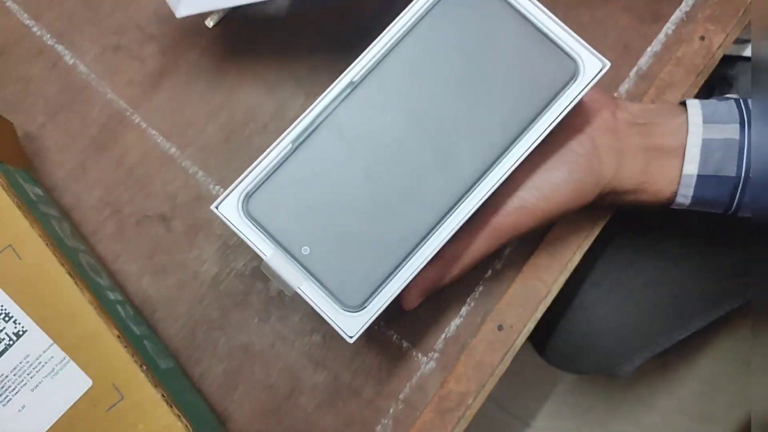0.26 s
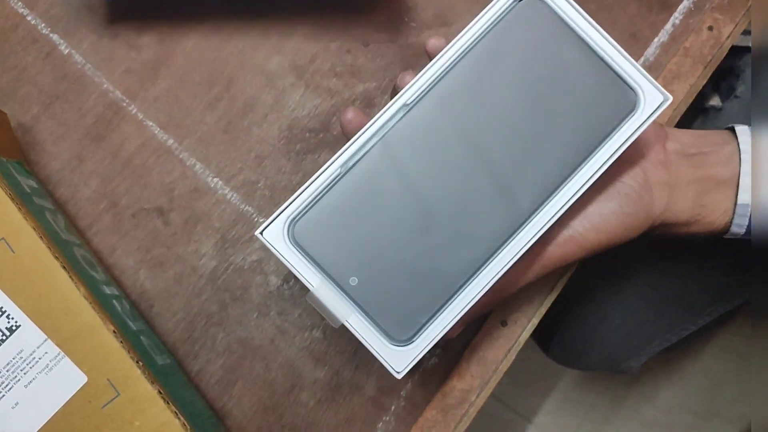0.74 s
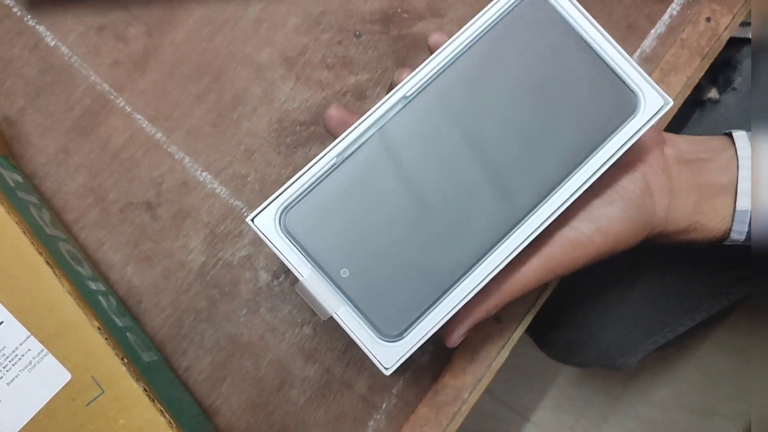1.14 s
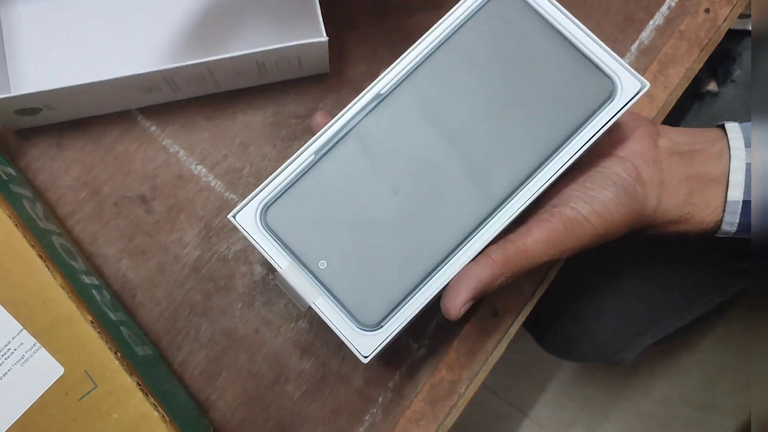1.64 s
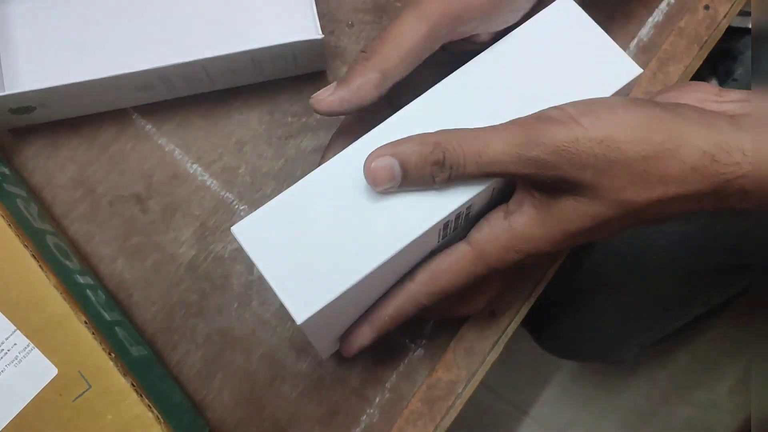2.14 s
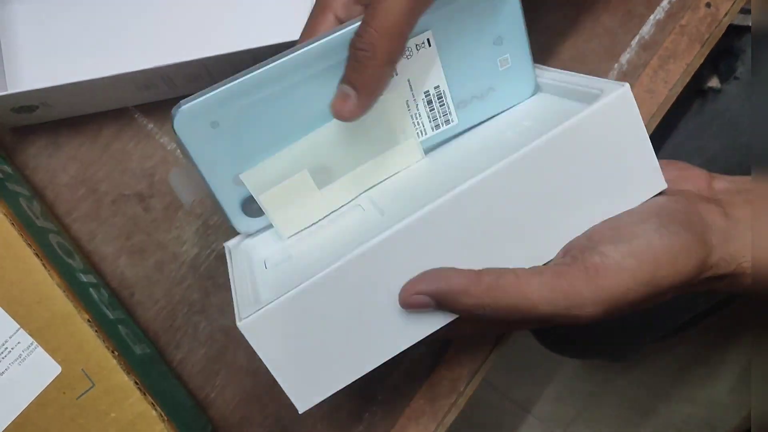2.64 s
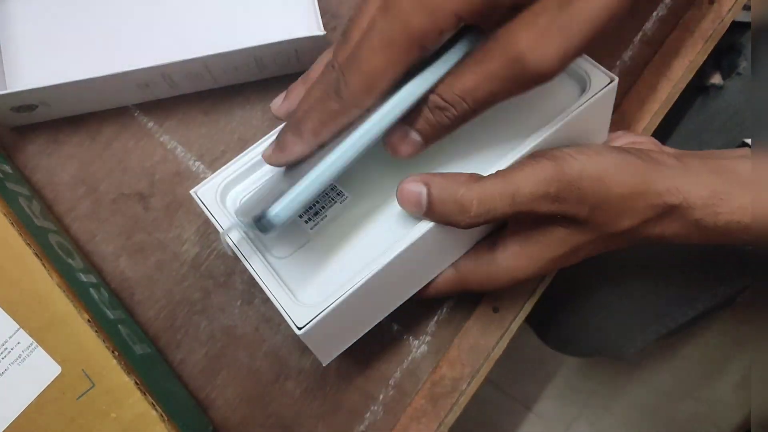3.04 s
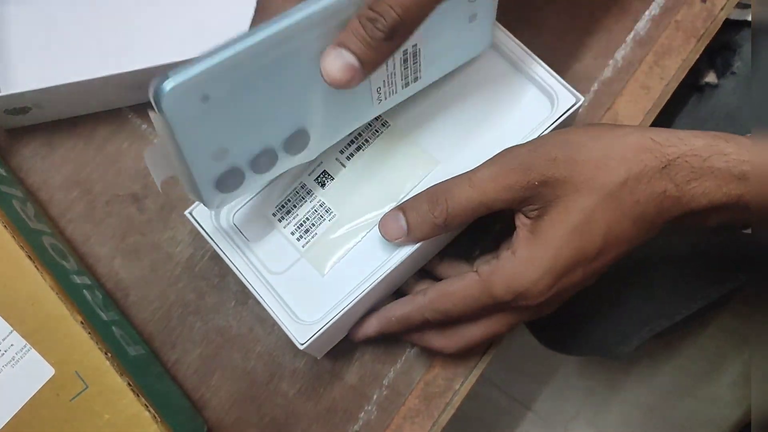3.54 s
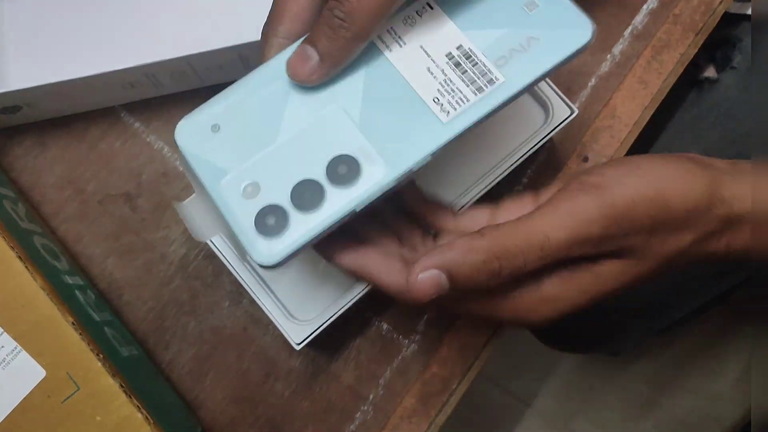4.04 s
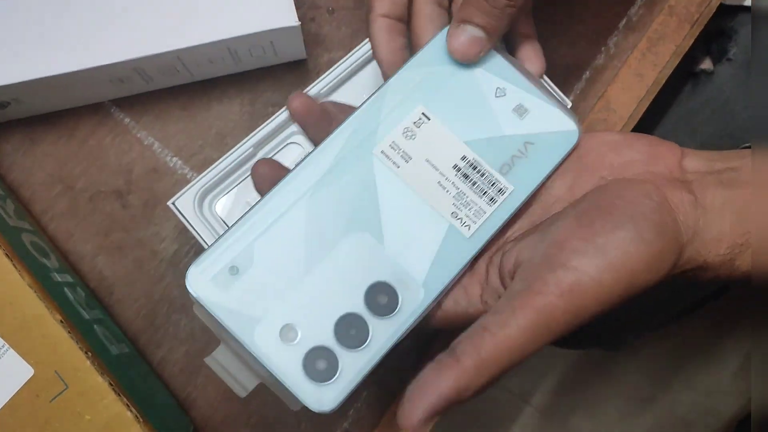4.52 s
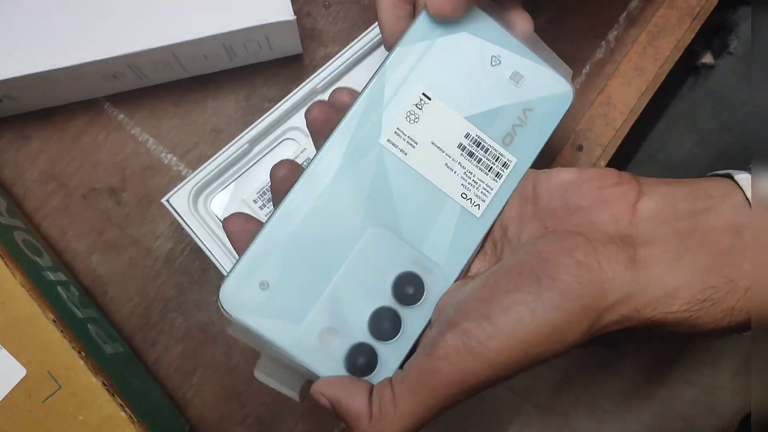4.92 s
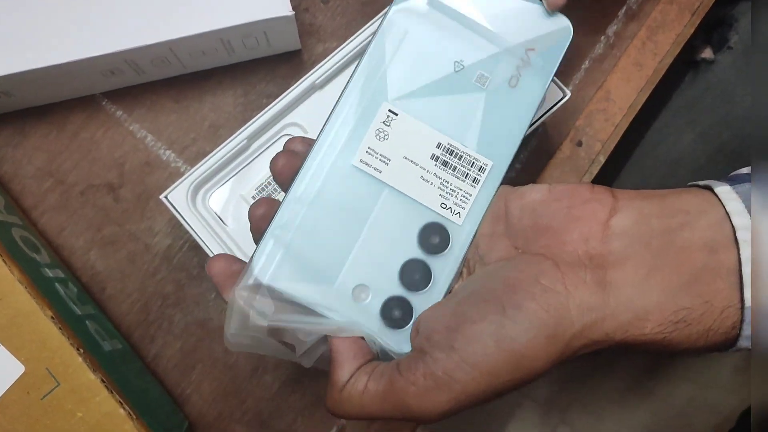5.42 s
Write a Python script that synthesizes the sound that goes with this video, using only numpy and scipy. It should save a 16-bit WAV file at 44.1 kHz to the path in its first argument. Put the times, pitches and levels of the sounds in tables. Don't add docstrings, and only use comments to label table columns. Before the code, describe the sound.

Hands unpack a phone from a small cardboard box on a wooden desk. A light tap and faint finger squeak come first, then the lid drags with a hollow stick-slip scrape and drops in two hard knocks. After a pause, the box is tipped and knocked down, and protective film crackles, snapping brightest near the end. Quiet room with low fan noise, close stereo phone microphone.

```python
import sys
import numpy as np
from scipy import signal
from scipy.fft import rfft, irfft, next_fast_len
from scipy.io import wavfile
from scipy.ndimage import uniform_filter1d

SR = 44100
rng = np.random.default_rng(int(sys.argv[2]) if len(sys.argv) > 2 else 0)


def gain_from_db(level_db):
    decades = np.asarray(level_db, float) / 20
    return 10 ** decades


def master_out(mix):
    frames = np.transpose(np.atleast_2d(mix))
    ceiling = np.clip(frames, -1, 1)
    pcm = np.round(ceiling * 32767).astype(np.int16)
    wavfile.write(sys.argv[1], SR, pcm)


N = 250223
T = np.arange(N) / SR
FAST = next_fast_len(N)

# frequency in Hz, level in dB, t60 in seconds.
LID_MODES = [(174, -45, 0.22), (236.6, 3, 0.14), (417, 1, 0.051), (494.6, 1.5, 0.084), (630, 6.5, 0.03),
             (700, 1, 0.074), (895.4, 2, 0.034), (1242, -3, 0.029), (1450, -9.5, 0.046), (1990, -2, 0.02),
             (1930, -12, 0.063), (2720, -41, .03)]
# frequency in Hz, level in dB, t60 in seconds.
DESK_MODES = [(66.1, -16, 0.66), (102.6, -9.5, 0.25), (159.6, -3, 0.22)]


def on_log(table, hz, column=1):
    rows = np.array(table)
    return np.interp(np.log(np.maximum(hz, 1)), np.log(rows[:, 0]), rows[:, column])


def band(x, lo_hz, hi_hz):
    sos = signal.butter(2, [lo_hz, min(hi_hz, .45 * SR)], "band", fs=SR, output="sos")
    y = signal.sosfilt(sos, x)
    return y / np.std(y)


def ring(modes, stretch=0.6, size=16384):
    t = np.arange(size) / SR
    out = np.zeros(size)
    for k, (hz, db, t60_s) in enumerate(modes):
        decay = np.exp(-np.log(1000) * t / (t60_s * stretch))
        out += (-1) ** k * gain_from_db(db) * decay * np.sin(2 * np.pi * hz * t)
    return out


def add(track, start_s, sound):
    i = int(start_s * SR)
    track[i:i + len(sound)] += sound[:N - i]


def walk(rate_hz):
    k = max(int(SR / 64 / rate_hz), 1)
    w = uniform_filter1d(uniform_filter1d(rng.standard_normal(N // 64 + 2), k), k)
    return np.interp(np.arange(N) / 64, np.arange(len(w)), w / np.std(w))


def grains(rate_hz, scatter_db):
    chance = rng.random((3, N))
    happens = chance[0] < rate_hz / SR
    size = gain_from_db(-scatter_db * np.log(chance[2] + 1e-9))
    return happens * np.sign(chance[1] - .5) * size


def swells(rows, extra_db=0):
    gain = np.zeros(N)
    for row, more_db in zip(rows, np.zeros(len(rows)) + extra_db):
        peak_s, db, rise_s, fade_s = row[:4]
        slope = np.where(T < peak_s, (T - peak_s) / rise_s, (peak_s - T) / fade_s)
        gain += gain_from_db(db + more_db) * np.exp(slope)
    return gain


def diffuse(x, y):
    # frequency in Hz, likeness of the ports from 0 to 1.
    alike = [(60, 0.8), (130, 0.93), (290, 0.92), (640, 0.63), (1410, 0), (3100, 0), (6820, 0.08),
             (15000, 0.0)]
    size = next_fast_len(len(x))
    c = np.clip(on_log(alike, np.fft.rfftfreq(size, 1 / SR)), 0, 1)
    mid = rfft(x, size) * np.sqrt((1 + c) / 2)
    side = rfft(y, size) * np.sqrt((1 - c) / 2)
    return irfft(np.array([mid + side, mid - side]), size)[:, :len(x)]


def air():
    # frequency in Hz, density in dB per Hz.
    fan = [(12, -30), (20, 12), (48, 6.5), (70, -5.5), (107, 0), (123, -5.5), (248, -7), (328, -6.5),
           (513, -5), (738, -11.5), (2080, -14), (2320, -12), (5680, -29), (13500, -33), (16000, -68)]
    fan_db, hum_hz, hum_db = -51.5, 100, -66
    out, swell = 0, walk(0.33)
    for hz in 22 * 2 ** np.arange(0, 9.6, .5):
        db = on_log(fan, hz) + 10 * np.log10(hz) + .3 * swell + 1.4 * walk(11)
        out = out + gain_from_db(db) * band(rng.standard_normal((2, N)), hz / 2 ** 0.27, hz * 2 ** 0.19)
    hum = gain_from_db(hum_db + 3 * walk(4)) * np.sin(2 * np.pi * hum_hz * T)
    return diffuse(*out) * gain_from_db(fan_db) / np.std(out) + hum


def room_tail(size=32768):
    # frequency in Hz, t60 in seconds, level in dB.
    room = [(60, 0.8, -7), (240, 0.47, -5), (700, 0.5, -0.5), (1990, 0.44, -4), (4920, 0.54, -9.5),
            (12200, 0.22, 6.5)]
    t, tails = np.arange(size) / SR, 0
    onset = 1 - np.exp(-(t / 0.004) ** 2)
    for hz in 63 * 2. ** np.arange(8):
        t60_s = on_log(room, hz)
        noise = band(rng.standard_normal((2, size)), hz / np.sqrt(2), hz * np.sqrt(2)) * np.sqrt(hz / t60_s)
        fade = np.exp(-np.log(1000) * t / t60_s) * onset
        tails = tails + gain_from_db(on_log(room, hz, column=2)) * noise * fade
    return diffuse(*tails) / np.sqrt(np.sum(tails[0] ** 2))


def scatter(x, lags):
    glance_share = 0.19
    for lag in lags:
        taps = np.r_[1, np.zeros(int(lag) - 1), glance_share]
        x = np.roll(signal.lfilter(taps[::-1], taps, x), -int(lag))
    return x


def rustle():
    # peak in seconds, level in dB, rise in seconds, fade in seconds,
    # skin rub over the film in dB.
    rubs = [(0.02, -57, 0.0033, 0.033, -20), (0.183, -56, 0.0061, 0.0079, -1), (0.422, -56, 0.02, 0.13, -7),
            (2.436, -58, 0.021, 0.0048, 8), (2.655, -42, 0.0094, 0.032, -0.5),
            (2.75, -56, .012, 0.028, -10), (2.86, -61, .005, 0.026, 4), (2.949, -47, 0.0028, 0.028, -18),
            (2.975, -46.5, 0.011, 0.036, -0.5), (3.31, -81, 0.022, 0.042, 3), (3.5, -60, 0.36, 0.019, -2),
            (3.61, -61.5, .01, 0.062, 2), (4.04, -56, 0.028, 0.027, -12), (4.106, -41.5, 0.0024, .02, -6.5),
            (4.21, -57.5, 0.019, 0.069, -29), (4.514, -52.5, 0.03, 0.025, -7),
            (4.564, -54.5, 0.013, 0.09, -18), (4.72, -56, 0.027, .015, -6), (4.866, -57, 0.027, 0.1, -13),
            (5.14, -62, 0.005, 0.033, -8), (5.343, -39, 0.0031, 0.02, -22),
            (5.383, -49.5, 0.0059, 0.088, -13), (5.49, -41.5, 0.037, 0.16, -39),
            (5.643, -42, 0.0065, 0.014, -2.5)]
    # peak in seconds, level in dB, rise in seconds, fade in seconds.
    handling = [
        (0.144, -55, 0.055, 0.017),
        (0.34, -56, 0.066, 0.011),
        (2.55, -64, .04, .025),
        (2.826, -45.5, 0.012, 0.019),
        (3.054, -57, .012, 0.11),
    ]
    # peak in seconds, level in dB, rise in seconds, fade in seconds.
    squeaks = [
        (0.3, -58, 0.025, 0.03),
        (0.36, -53, 0.024, 0.26),
    ]
    squeak_hz, squeak_width_hz = 1836, 510

    crackle = grains(3000, 2.1)
    film_top = gain_from_db(-3.5) * band(crackle, 8000, 15000)
    film = swells(rubs) * (band(crackle, 2200, 7000) + film_top)
    rub = swells(rubs, np.array(rubs)[:, -1]) * band(grains(2500, 3.0), 500, 2000)
    edges_hz = squeak_hz + np.array([-.5, .5]) * squeak_width_hz
    squeak = swells(squeaks) * band(rng.standard_normal(N), *edges_hz)
    bumps = swells(handling) * band(grains(170, 1.0), 35, 184)
    return gain_from_db(2.0 * walk(71)) * (film + rub) + squeak + bumps


def snaps():
    # start in seconds, knock level in dB, knock in Hz, nail click over the knock in
    # dB.
    nail_taps = [(0.0734, -45, 1040, 6), (0.177, -50, 791, 0), (0.3506, -20.5, 1150, -47),
                 (0.3539, -29.5, 840, -20), (0.5482, -36.5, 905, -2), (1.1179, -28.5, 860, 4),
                 (2.256, -41.5, 910, -14), (2.6365, -37, 734, 5.5), (2.6524, -39, 725, -10),
                 (2.68, -24.5, 1140, -5), (2.6944, -33, 704, -4), (2.8576, -47, 837, 11.5),
                 (2.9743, -30.5, 750, -12), (3.0889, -34.5, 710, 1.5), (3.3468, -40, 700, -7),
                 (3.4097, -45, 684, 0), (4.2778, -46, 1210, 4.5), (5.1223, -35, 836, -14),
                 (5.1262, -34, 1400, 6), (5.6409, -32.5, 680, 8.5)]
    # start in seconds, peak
    # in dB, snap in Hz, sizzle in dB.
    buckles = [(2.4324, -29.5, 4670, -35), (2.6189, -46, 2410, -5), (2.7475, -50, 2440, 6),
               (2.9755, -19.5, 5670, -15), (3.8212, -18.5, 5500, -19), (4.0253, -41, 3400, -5),
               (4.1047, -24, 2930, -17.5), (4.374, -33, 3370, -18), (4.503, -32.5, 4350, -16),
               (4.513, -34.5, 2700, -7), (4.559, -31.5, 2720, -15), (4.576, -35.5, 2510, -6.5),
               (4.724, -29, 5300, -12.5), (4.8349, -32.5, 6030, -17), (4.8652, -26, 7400, -30),
               (4.8988, -35, 2590, -10.5), (4.913, -44, 5570, -2), (4.995, -24, 6150, -14.5),
               (5.0583, -14, 6600, -23.5), (5.1255, -5, 5330, -20.5),
               (5.2545, -33.5, 1980, -9.5), (5.2664, -42.5, 4150, -1), (5.3338, -19.5, 5500, -13.5),
            (5.3828, -21.5, 4530, -6.5), (5.4019, -30, 2820, 1), (5.46, -22, 5460, -20),
            (5.4778, -20, 4070, -2), (5.5096, -10.5, 4930, -17), (5.523, -15, 6160, -24),
            (5.6084, -19, 5270, -23), (5.634, -20.5, 4690, -10), (5.638, -15, 5100, -20)]
    nail_hz, nail_sizzle_db = 2600, -11
    film_knock_db, film_knock_hz = -49, 1400

    out, t = np.zeros(N), np.arange(-100, 1948) / SR
    nails = [(s, db + click_db, nail_hz, -click_db, hz, nail_sizzle_db) for s, db, hz, click_db in nail_taps]
    film = [(s, db, hz, film_knock_db, film_knock_hz, sizzle_db) for s, db, hz, sizzle_db in buckles]
    for s, db, hz, low_db, low_hz, sizzle_db in nails + film:
        snap = np.cos(2 * np.pi * hz * t) * np.exp(-np.abs(t) * hz / np.where(t < 0, .5, .75))
        knock = gain_from_db(low_db) * np.sin(2 * np.pi * low_hz * t) * np.exp(-t * low_hz / 1.28) * (t > 0)
        burst = np.exp(-np.abs(t) / np.where(t < 0, .0006, .003))
        sizzle = gain_from_db(sizzle_db) * band(rng.standard_normal(len(t)), 0.53 * hz, 3.05 * hz) * burst
        add(out, s - .0015, gain_from_db(db) * (sizzle - snap - knock))
    return out


def drag():
    # time in seconds, sliding level in dB, grip (how hard the edge catches) in dB.
    path = [
        (0.545, -66.5, 10.5),
        (0.615, -49, 2),
        (0.67, -49.5, 8.5),
        (0.7, -43.5, 5.5),
        (0.78, -39, 6),
        (0.825, -42.5, 1),
        (0.855, -44, 1),
        (0.983, -37.5, -2.5),
        (1.105, -64, 5.5),
    ]
    # peak in seconds, level in dB, rise in seconds, fade in seconds.
    skids = [
        (1.128, -42.5, 0.008, 0.054),
        (1.39, -37, 0.012, 0.058),
        (1.535, -45, 0.0067, 0.044),
    ]
    skid_grip_db, fibre_db, fibre_top_db = 2.5, -12, -4.5
    drone_db, drone_db_per_grip_db = -6, -.3
    slip_edge = 0.9

    s, slide_db, grip = np.array(path).T
    moving = uniform_filter1d(1. * (T > s[0]) * (T < s[-1]), size=200)
    slide = moving * gain_from_db(np.interp(T, s, slide_db)) + swells(skids)
    grip_db = np.interp(T, s, grip, right=skid_grip_db)

    slips = grains(900, 2.7)
    sprung = slips - slip_edge * np.roll(slips, 1)
    body = signal.fftconvolve(sprung, ring(LID_MODES, 0.45))[:N]
    desk = signal.fftconvolve(slips, ring(DESK_MODES[:2], 0.45))[:N]
    card = band(slips + .5 * rng.standard_normal(N), 970, 3610)
    fibres = grains(5400, 2.3)
    hiss = band(fibres, 2400, 7500) + gain_from_db(fibre_top_db) * band(fibres, 8000, 14500)

    ringing = gain_from_db(grip_db) * body / np.std(body)
    drone = gain_from_db(drone_db + drone_db_per_grip_db * grip_db) * desk / np.std(desk)
    return slide * gain_from_db(1.5 * walk(60)) * (ringing + card + gain_from_db(fibre_db) * hiss + drone)


def blows(table, body, wood):
    slap_db, slap_hz, slap_s = -5, 750, 0.00042
    crack_db, crack_db_per_ms = -13, -59

    out, thuds, t = np.zeros(N), np.zeros(N), np.arange(8192) / SR
    slap = gain_from_db(slap_db) * np.sin(2 * np.pi * slap_hz * t) * np.exp(-t / slap_s)
    for s, db, contact_ms, thud_db, stretch in table:
        push = t[:1000] * np.exp(-1000 * t[:1000] / contact_ms)
        struck = np.array(body) + rng.standard_normal((len(body), 1)) * [0, 2.5, 0]
        knock = signal.fftconvolve(ring(struck, stretch, size=len(t)), push)[:len(t)]
        puff = signal.fftconvolve(slap, push / push.sum())[:len(t)]
        knock = knock / np.abs(knock).max() + puff
        noise = rng.standard_normal(len(t))
        buzz = band(noise, 1000, 3200) * np.exp(-t / 0.015)
        tick = gain_from_db(1.0) * band(noise, 3200, 8000) * np.exp(-t / 0.0014)
        crack = gain_from_db(crack_db + crack_db_per_ms * contact_ms) * (buzz + tick)
        add(out, s, gain_from_db(db) * (crack * (1 - np.exp(-t / 0.00047)) - knock))
        add(thuds, s, gain_from_db(db + thud_db) * np.ones(1))
    desk = ring(wood, size=32768) * (1 - np.exp(-T[:32768] / 0.012))
    return out + signal.fftconvolve(thuds, desk)[:N]


def scene():
    # start in seconds, peak in dB, contact in ms, desk thud in dB, ring stretch (ratio).
    lid_blows = [(0.588, -43, 0.59, 5, .5), (0.612, -30.5, 1, -12, 0.42), (0.815, -28.5, 0.77, -20, 0.95),
                 (1.117, -30, 0.05, 0.5, 0.46), (1.328, -22.5, 0.24, 0.5, 1),
                 (1.3673, -7, 0.034, -11, 0.84), (1.371, -18.5, 0.8, -27, 0.49),
                 (1.398, -29, 0.16, -6, 0.58), (1.417, -19.5, 0.17, 1.5, 0.6),
                 (1.5113, -21, 0.35, -23, 0.85), (1.5145, -8.5, 0.22, -5, 0.51),
                 (1.532, -25.5, 0.038, -18, 1)]
    # start in seconds, peak in dB, contact in ms, desk thud in dB, ring stretch (ratio).
    box_blows = [(2.8655, -35.5, 0.057, -9, 0.43), (3.045, -38.5, 0.15, -24, 1),
                 (3.1897, -18.5, 0.066, -18, 0.41), (3.1935, -43, 0.096, -18, 0.31),
                 (3.229, -37, 0.04, -6, 0.42), (3.773, -30, 0.2, -18, 0.96),
                 (3.7937, -16, 0.07, -7.5, 0.39), (3.7965, -21, 0.36, 6, 0.23),
                 (3.803, -37, .06, -22, 0.25), (3.817, -23.5, 0.3, -19, 0.75),
                 (4.106, -34, 0.087, -4, 0.83)]
    # frequency in Hz, level in dB, t60 in seconds.
    box_modes = [(162, -31, .12), (245, 0, 0.082), (290, 3.5, 0.096), (405, 1.5, 0.08), (520, 6, 0.05),
                 (607, 9, 0.06), (775, 4.5, 0.069), (838, 3.5, 0.053), (1150, 13, 0.013),
                 (1340, -58, 0.032), (1530, -36, 0.027), (1860, -24, 0.035), (2720, -25, .03)]
    # frequency in Hz, level in dB, t60 in seconds.
    far_desk_modes = [(70, -13.5, 0.31), (117.5, -15, 0.27), (174, 1.5, 0.12)]
    glances = [(5, 23), (11, 17)]
    card_db, card_wet_db, hands_wet_db = 0, -5.5, -13.5
    port_lag_s, lag_wander_s = 0.00012, 0.0001

    lid = blows(lid_blows, LID_MODES, far_desk_modes)
    box = blows(box_blows, box_modes, DESK_MODES)
    card = gain_from_db(card_db) * (lid + box + drag())
    hands = snaps() + rustle()
    near = card + hands
    late = np.interp(T - port_lag_s - lag_wander_s * walk(6.3), T, near)
    direct = np.array([scatter(x, lags) for x, lags in zip((near, late), glances)])
    send = gain_from_db(card_wet_db) * card + gain_from_db(hands_wet_db) * hands
    wet = signal.oaconvolve(send[None], room_tail(), axes=1)[:, :N]
    return direct + wet + air()


def band_limit(x):
    return signal.sosfilt(signal.butter(12, 16370, fs=SR, output="sos"), x)


def record(dry):
    # frequency in Hz, gain in dB.
    mic = [(30, -2.5), (80, 4), (7000, -0.5), (8000, -2), (14200, -6), (14900, -15), (17000, -22)]
    # frequency in Hz, left minus right in dB.
    ports = [(60, 0), (200, 0.5), (700, 0), (1290, -2), (2380, -8), (4400, -8), (6500, -9), (8500, 1.5),
             (15000, 1)]
    hiss_db = -78.5
    hz = np.fft.rfftfreq(FAST, 1 / SR)
    tilt_db = on_log(ports, hz) / 2
    hiss = gain_from_db(hiss_db) * band(rng.standard_normal((2, N)), 8500, 13500) * gain_from_db(3 * walk(12))
    gain = gain_from_db(on_log(mic, hz) + np.array([tilt_db, -tilt_db]))
    mix = irfft(rfft(dry + hiss, FAST) * gain, FAST)[:, :N]
    return band_limit(mix)


dry = scene()
out = record(dry)
master_out(out)
```